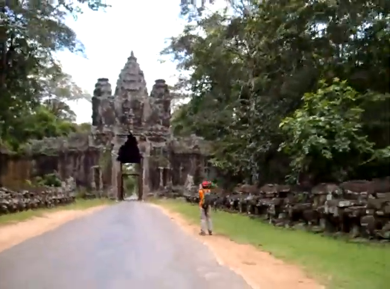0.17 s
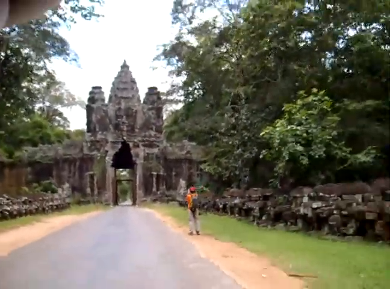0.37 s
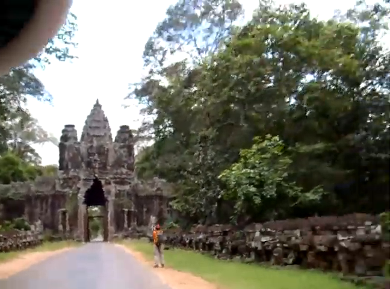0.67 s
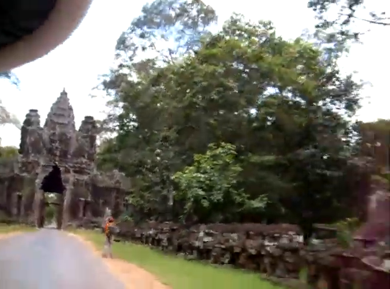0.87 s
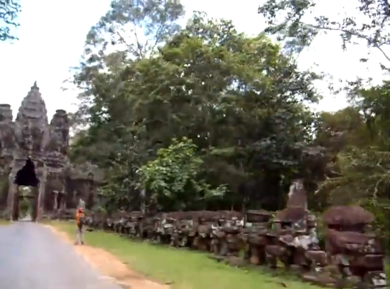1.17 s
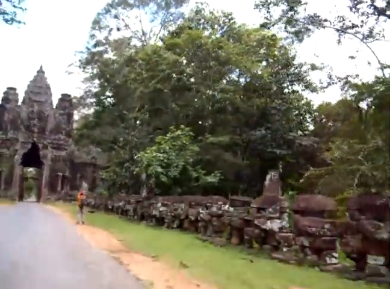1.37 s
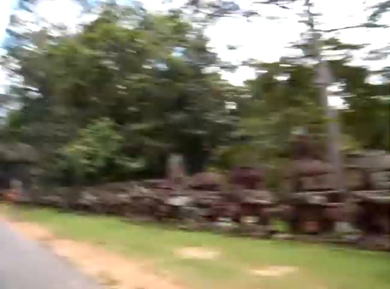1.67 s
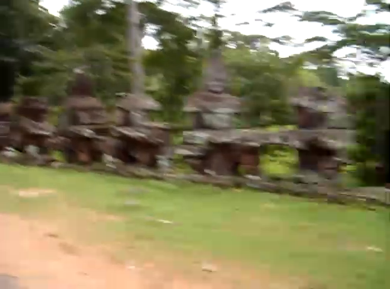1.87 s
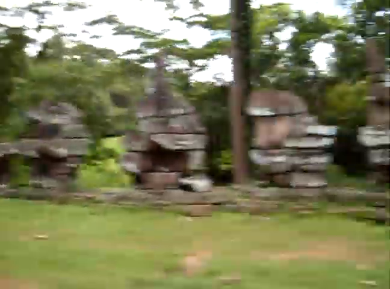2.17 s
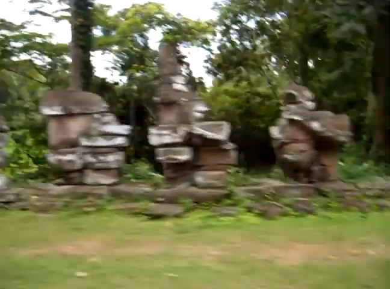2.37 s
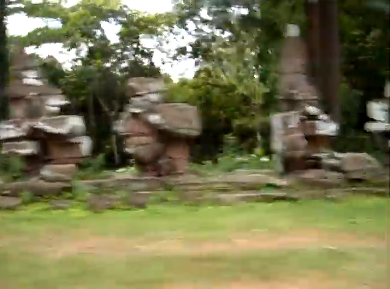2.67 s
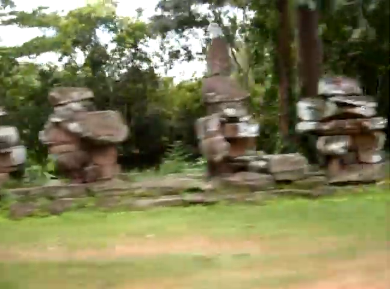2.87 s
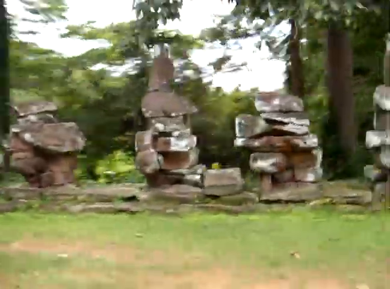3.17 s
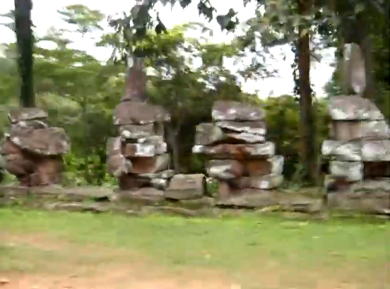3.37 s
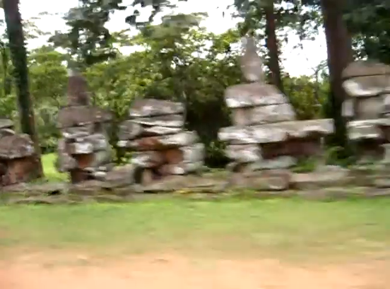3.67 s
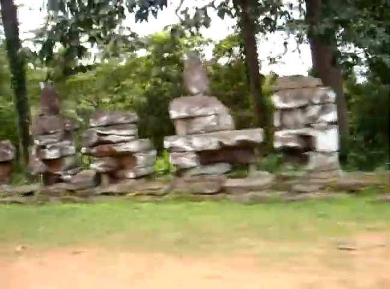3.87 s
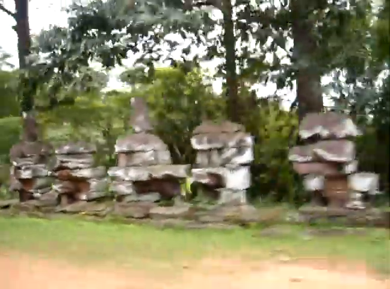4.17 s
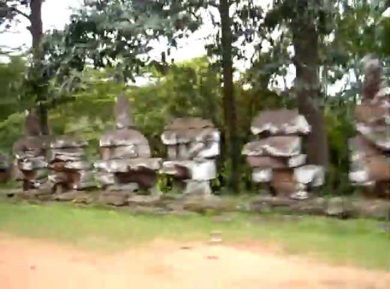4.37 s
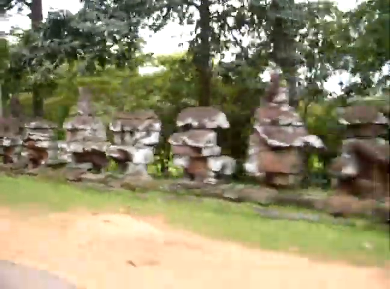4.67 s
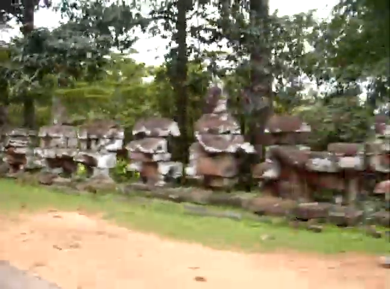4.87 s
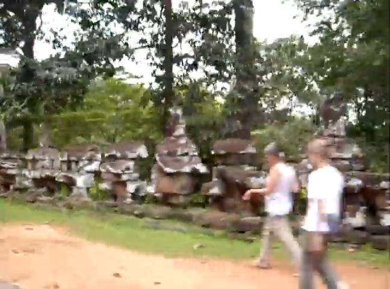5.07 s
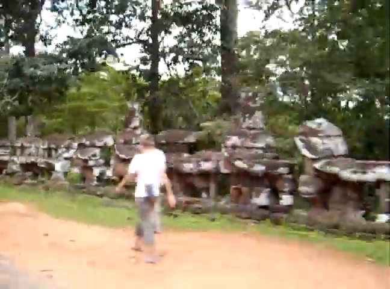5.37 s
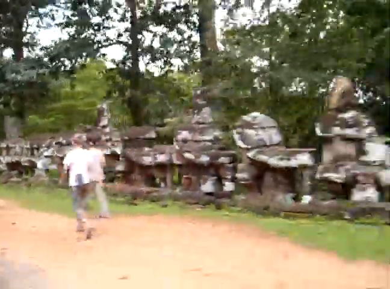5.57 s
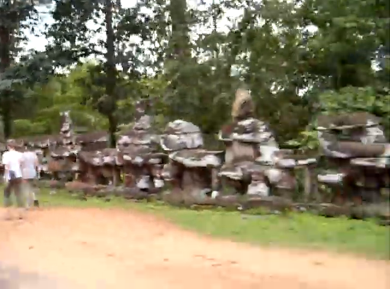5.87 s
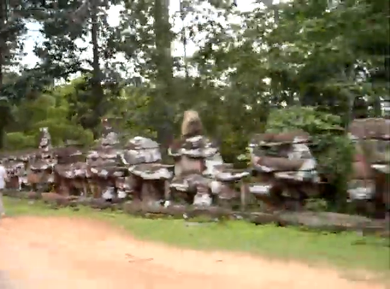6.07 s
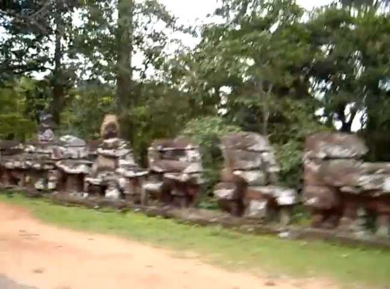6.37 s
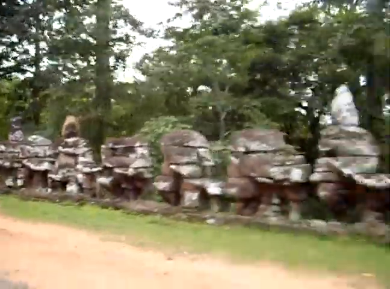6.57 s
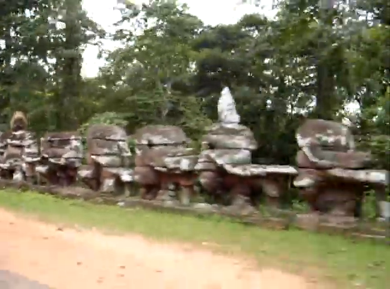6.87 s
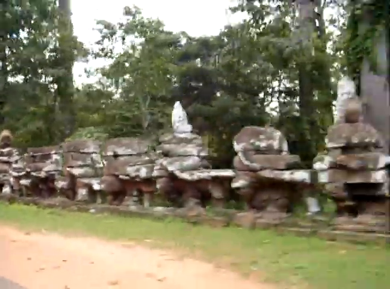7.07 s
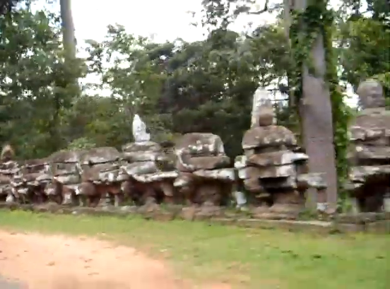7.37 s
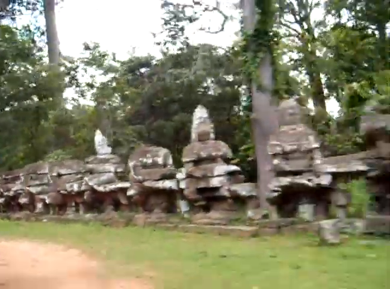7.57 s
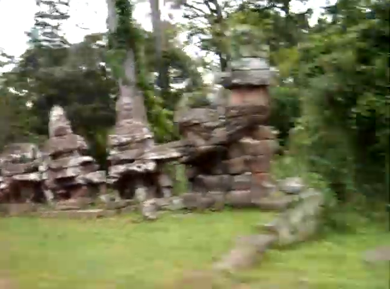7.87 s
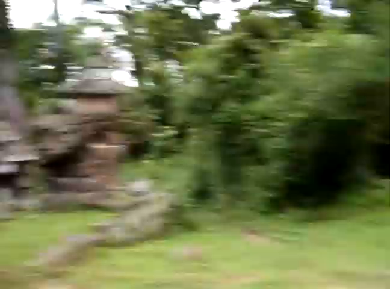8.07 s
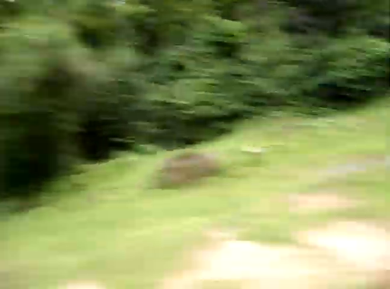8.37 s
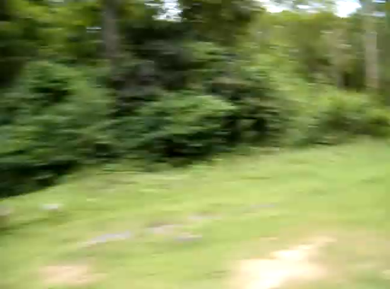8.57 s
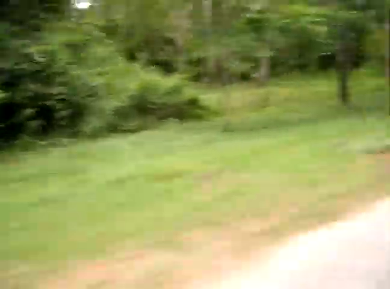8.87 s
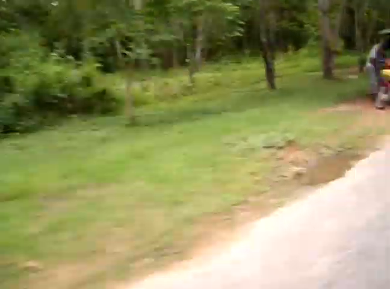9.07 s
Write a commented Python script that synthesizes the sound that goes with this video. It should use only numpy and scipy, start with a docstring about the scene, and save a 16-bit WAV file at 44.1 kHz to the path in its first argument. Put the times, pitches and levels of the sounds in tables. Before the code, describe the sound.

On an open road, wind rumbles and flaps against a small unprotected microphone, with dull thumps, sharp snaps and clipped bursts. In the calmer gaps a single-cylinder motorbike engine putters and drones low, with faint tyre hiss and a thin drive whine. Near the end the wind meets the mic head-on and becomes a continuous, distorted roar.

```python
"""Wind buffets a small microphone in a motorbike-drawn cart on an open road.
Band noise rumbles, brighter as the air stream strengthens, until the input overloads; swells, puffs,
vortices and snaps add pressure thumps and tears. At the end the microphone meets the stream head-on.
Underneath, firing pulses ring the exhaust of a single-cylinder engine beside a sine drone; the tyres
hiss in coloured noise, the drive whines as a wavering sine and fittings tick as resonant noise."""
import sys
import numpy as np
from scipy import signal
from scipy.io import wavfile
from scipy.ndimage import uniform_filter1d

SR = 44100
rng = np.random.default_rng(int(sys.argv[2]) if len(sys.argv) > 2 else 0)


def generate_wav(signal):
    """Clip the signal to [-1, 1] and save it as 16-bit WAV at the path in sys.argv[1]."""
    frames = np.transpose(np.atleast_2d(signal))
    scaled = np.clip(frames, -1, 1) * 32767
    pcm = np.round(scaled).astype(np.int16)
    wavfile.write(sys.argv[1], SR, pcm)


N = 406161
TIME = np.arange(N) / SR


def from_db(db):
    """Decibels to gain."""
    return 10 ** (np.asarray(db) / 20)


def highpass(x, order, hz):
    """Butterworth high-pass."""
    return signal.sosfilt(signal.butter(order, hz, "high", fs=SR, output="sos"), x)


def bandpass(x, order, low_hz, high_hz):
    """Butterworth band-pass."""
    return signal.sosfilt(signal.butter(order, [low_hz, high_hz], "band", fs=SR, output="sos"), x)


def lowpass_zero_phase(x, order, hz):
    """Butterworth low-pass run both ways."""
    return signal.sosfiltfilt(signal.butter(order, hz, fs=SR, output="sos"), x)


def rms_one(x):
    """Scale to unit power."""
    return x / np.sqrt(np.mean(x ** 2) + 1e-20)


def in_time(rows):
    """Each column of a curve at every sample."""
    time_s, *columns = np.transpose(rows)
    return [np.interp(TIME, time_s, column) for column in columns]


def at_hz(rows, hz):
    """Each column of a spectrum at one frequency, interpolated over log frequency."""
    points_hz, *columns = np.transpose(rows)
    return [np.interp(np.log(hz), np.log(points_hz), column) for column in columns]


def around(time_s, before_s, after_s):
    """Slice of samples about a moment, cut at the start."""
    return slice(max(int((time_s - before_s) * SR), 0), int((time_s + after_s) * SR))


def drift(rate_hz):
    """Smooth chance with spread 1 that changes about rate_hz times a second."""
    step = 20  # samples per slow point
    settle = 2000
    r = np.exp(-2 * np.pi * rate_hz * step / SR)
    white = rng.standard_normal(N // step + 2 + settle)
    slow = signal.lfilter([1], [1, -2 * r, r * r], white)[settle:]
    return np.interp(np.arange(N) / step, np.arange(len(slow)), rms_one(slow))


def noise_bands(low_hz, high_hz):
    """Yield (centre Hz, noise of unit power per Hz) for bands 0.4 octave wide."""
    edges_hz = 2 ** np.arange(np.log2(low_hz), np.log2(high_hz) + .4, .4)
    white = rng.standard_normal((2, N + SR // 2))  # neighbouring bands use separate noise
    for k, (low, high) in enumerate(zip(edges_hz, edges_hz[1:])):
        band = bandpass(white[k % 2], 2, low, high)[-N:]
        yield np.sqrt(low * high), rms_one(band) * np.sqrt(high - low)


def coloured_noise(colour):
    """Steady noise with the given spectrum; rms 1."""
    out = 0
    for hz, band in noise_bands(colour[0][0], colour[-1][0]):
        out = out + from_db(at_hz(colour, hz)[0]) * band
    return rms_one(out)


def resonate(x, modes):
    """Parallel two-pole resonances with alternating signs."""
    out = 0
    for k, (hz, width_hz, db) in enumerate(modes):
        r = np.exp(-np.pi * width_hz / SR)
        poles = [1, -2 * r * np.cos(2 * np.pi * hz / SR), r * r]
        ring = signal.lfilter([1, 0, -1], poles, x + 1e-18)
        out = out + (-1) ** k * from_db(db) * (1 - r * r) / 2 * ring
    return out


# tyres on the road: (time [s], level [dB])
ROAD_LEVEL = [(0, -35.5), (1.8, -32.5), (2.1, -28.5), (2.7, -29), (3.2, -31), (3.6, -28.5), (4.0, -31.5),
              (4.3, -33), (6.3, -33.5), (7.6, -32.5), (7.9, -27.5), (8.2, -34.5)]
# tyre spectrum shape: (frequency [Hz], relative density [dB per Hz])
ROAD_COLOUR = [(100, -0.5), (250, -9.5), (500, -3), (800, -0.5), (1200, 0.5), (1600, -8.5), (1950, -19.5),
               (2600, -8), (3300, -15.5), (4200, -19.5), (5000, -12.5), (6000, -15)]


def tyres(grit_db):
    """Rolling noise, slightly grainy from the rough surface."""
    return from_db(in_time(ROAD_LEVEL)[0] + grit_db * drift(150)) * coloured_noise(ROAD_COLOUR)


# fittings touching: (time [s], onset level [dB])
TICKS = [(4.364, -26.5), (4.759, -27)]
# ring of the fittings: (frequency [Hz], width [Hz], relative level [dB])
FITTING_MODES = [(3970, 240, 0), (4740, 500, -2)]


def ticks(decay_s):
    """Loose fittings touch briefly: decaying bursts of resonant noise."""
    touches = np.zeros(N)
    for time_s, db in TICKS:
        touches += from_db(db) * (TIME >= time_s) * np.exp(-np.abs(TIME - time_s) / decay_s)
    return touches * rms_one(resonate(rng.standard_normal(N), FITTING_MODES))


# drive whine, swooping as the load changes: (time [s], centre frequency [Hz])
WHINE_PITCH = [(0, 2390), (4.45, 2406), (4.8, 2335), (4.92, 2470), (5.03, 2378), (5.38, 2450), (5.5, 2364),
               (6.05, 2430), (7.2, 2374), (7.5, 2345)]
# drive whine: (time [s], level [dB])
WHINE_LEVEL = [(0.6, -47.5), (4.0, -49.5), (4.88, -43), (5.8, -47), (6.1, -44.5), (7.5, -44.5),
               (8.3, -50.5)]


def whine(waver_hz, blur_hz, flicker_db):
    """A thin sine from the drive, unsteady in pitch and level."""
    pitch_hz = in_time(WHINE_PITCH)[0] + waver_hz * drift(6.8) + blur_hz * drift(150)
    cycles = np.cumsum(pitch_hz) / SR
    tone = np.sin(2 * np.pi * cycles) * from_db(flicker_db * drift(19))
    return from_db(in_time(WHINE_LEVEL)[0]) * rms_one(tone)


# engine: (time [s], mean crank speed [turns/s], level before the part gains [dB])
ENGINE = [(0, 62.4, -28), (1.5, 57.4, -25), (3, 58.3, -23.5), (6, 62.2, -25), (7.5, 66, -25.5),
          (9.21, 71.5, -35)]
# exhaust resonances: (frequency [Hz], width [Hz], relative level [dB])
EXHAUST_MODES = [(134, 36, 9), (168, 52, 1), (400, 170, -12)]


def engine(wander, uneven_db, putter_db, drone_db):
    """One firing every second turn rings the exhaust; the second crank order drones clean."""
    turns_per_s, level_db = in_time(ENGINE)
    turns = np.cumsum(turns_per_s * (1 + wander * drift(3.1))) / SR
    firings = np.diff(np.floor(turns / 2), prepend=0) * from_db(uneven_db * drift(43))
    putter = rms_one(resonate(firings, EXHAUST_MODES))
    drone = rms_one(np.sin(2 * np.pi * 2 * turns))
    return from_db(level_db) * (from_db(putter_db) * putter + from_db(drone_db) * drone)


# slow pressure swells: (time [s], level before lumps [dB])
SWELL_LEVEL = [(0.0, -18.5), (0.18, -14.5), (0.62, -24), (1.13, -18.5), (2.59, -17.5), (2.84, -23.5),
               (8.44, -19.5), (8.93, -22)]
# swell spectrum shape: (frequency [Hz], relative density [dB per Hz])
SWELL_COLOUR = [(12, -0.5), (18, 0.5), (30, -1), (50, -8), (80, -9.5), (130, -15), (300, -50)]


def swell(lumps_db):
    """The largest eddies push the diaphragm slowly to and fro, in lumps with lulls between."""
    return from_db(in_time(SWELL_LEVEL)[0] + lumps_db * drift(17)) * coloured_noise(SWELL_COLOUR)


# dull pressure puffs: (time [s], peak level before the leak [dB])
PUFFS = [(1.138, 2.5), (2.497, 1), (2.632, 1.5), (2.94, 0.5), (3.465, -2.5), (4.356, -3.5), (4.554, -2.5),
         (4.704, -4), (5.598, -6), (6.99, 2), (8.148, -1)]


def puffs(build_s, release_s, leak_hz):
    """Pressure piles up on the port and collapses; the capsule's vent leaks it away."""
    pressure = np.zeros(N)
    for time_s, db in PUFFS:
        near = np.abs(TIME - time_s) < .1
        age_s = TIME[near] - time_s
        pressure[near] += from_db(db) * np.exp(-np.maximum(-age_s / build_s, age_s / release_s))
    return highpass(pressure, 1, leak_hz)


# tight vortices crossing the port: (time [s], envelope peak [dB], nominal pitch [Hz])
VORTICES = [(1.14, 2, 481.6), (1.541, 3, 447), (2.333, 4, 402), (2.452, -3.5, 522), (2.488, -4.5, 450),
            (2.522, 0, 433), (2.589, -4.5, 602), (2.646, -4.5, 549.5), (2.825, -1.5, 496.3),
            (3.766, -5, 521), (3.804, -0.5, 345.4), (4.002, -3.5, 553), (4.06, -7.5, 600),
            (6.502, -2.5, 796.2), (8.34, -0.5, 376)]


def vortices(rise_cycles, fall_cycles, tail_s, rough_octaves, steepness):
    """Ragged, steep-fronted pressure cycles: large vortices thump, small ones crack."""
    out, ragged = np.zeros(N), drift(2500)
    for time_s, db, hz in VORTICES:
        near = np.abs(TIME - time_s) < .05
        age_s = TIME[near] - time_s
        # the roughness is stretched to the vortex's own cycle
        roughness = np.interp(age_s * hz / 2500, age_s, ragged[near])
        phase = 2 * np.pi * np.cumsum(hz * 2 ** (rough_octaves * roughness)) / SR
        outside = np.maximum(-age_s / (rise_cycles / hz), age_s / (fall_cycles / hz + tail_s))
        out[near] += from_db(db) * np.exp(-outside) * np.sin(phase + steepness * np.sin(phase))
    return out


# air tearing at the port edge: (time [s], peak level [dB])
SNAPS = [(0.32, -14.5), (0.478, -13.5), (0.535, -6), (0.929, -11.5), (1.097, -14.5), (1.61, -14.5),
         (2.336, -6), (2.409, -19), (2.427, -12), (2.488, -10.5), (2.534, -13), (2.591, -20), (2.645, -9),
         (2.829, -11), (3.766, -14), (3.875, -19), (4.002, -22), (4.057, -9), (5.272, -18), (5.76, -6),
         (6.015, -1), (6.468, -13.5), (6.501, -10), (7.056, -14), (8.339, -11.5)]


def snaps(low_hz, high_hz, top_hz, rise_s, fall_s):
    """Each tear is a few milliseconds of ragged pressure, full in the middle, falling in the treble."""
    ragged = bandpass(rng.standard_normal(N), 1, low_hz, high_hz)
    ragged = lowpass_zero_phase(ragged, 2, top_hz)
    short_power = uniform_filter1d(ragged ** 2, size=SR // 400)
    ragged = ragged / np.sqrt(short_power + 1e-12)
    envelope = np.zeros(N)
    for time_s, db in SNAPS:
        near = np.abs(TIME - time_s) < .03
        age_s = TIME[near] - time_s
        envelope[near] += from_db(db) * np.exp(-np.maximum(-age_s / rise_s, age_s / fall_s))
    return envelope * ragged


# how squarely the microphone faces the stream: (time [s], share [0-1])
FACING = [(8.47, 0.3), (8.66, 0.78), (8.71, 0.87), (8.79, 1), (8.88, 0.92), (9.04, 1), (9.21, 0.95)]


def facing_share():
    """Share of the stream met head-on."""
    return np.clip(in_time(FACING)[0], 0, 1)


# steady air stream before the facing gain: (time [s], strength [dB])
STREAM = [(0, -30), (0.3, -28), (0.6, -31), (1.25, -29.5), (1.42, -30.5), (2.05, -30), (2.25, -37),
          (2.5, -26), (2.75, -35.5), (3.9, -35.5), (4.2, -37), (5.15, -37), (5.6, -31), (6.25, -32.5),
          (6.9, -27), (7.4, -32), (8.3, -32.5)]
# gusts: (crest time [s], strength [dB], rise constant [s])
GUSTS = [(0.17, -15.5, 0.068), (0.42, -17, 0.091), (0.87, -17.5, 0.06), (1.11, -17.5, 0.027),
         (1.517, -12.5, 0.03), (1.98, -17.5, 0.2), (2.49, -18.5, 0.07), (2.634, -14, 0.018),
         (3.029, -16.5, 0.0063), (3.121, -19.5, 0.0088), (3.319, -18, 0.02), (3.56, -18.5, 0.013),
         (3.686, -19, 0.014), (3.821, -21, 0.041), (4.03, -19.5, 0.11), (4.645, -22, 0.058),
         (5.018, -19, 0.049), (5.25, -21.5, 0.12), (5.538, -18.5, 0.051), (5.79, -18.5, 0.033),
         (6.034, -17, 0.024), (6.432, -17.5, 0.045), (6.51, -17.5, 0.05), (6.704, -15, 0.047),
         (6.89, -17.5, 0.052), (7.048, -15, 0.023), (7.265, -19, 0.037), (7.77, -21, 0.072),
         (8.149, -16.5, 0.03), (8.45, -17, 0.084)]
FACING_GAIN_DB = 24.5
GUST_EBB = 1.88  # ebb constant / rise constant


def air_flow(facing):
    """Stream strength in dB: steady flow, more when met head-on, and gusts that swell and ebb."""
    flow = from_db(in_time(STREAM)[0] + FACING_GAIN_DB * facing)
    for crest_s, db, rise_s in GUSTS:
        near = around(crest_s, .3, .3)
        age_s = TIME[near] - crest_s
        outside = np.maximum(-age_s, age_s / GUST_EBB) / rise_s
        flow[near] = np.maximum(flow[near], from_db(db) * np.exp(-outside))
    return 20 * np.log10(flow)


# sharp eddies slapping the port: (time [s], strength before buffet_db [dB], hold [s])
BUFFETS = [(0.14, -8.5, 0.016), (0.155, -3.5, 0.026), (0.205, -6, 0.013), (0.362, -6.5, 0.022),
           (0.391, -6, 0.025), (0.448, -8.5, 0.011), (0.871, -13.5, 0.017), (1.094, -10.5, 0.013),
           (1.136, -11, 0.0042), (1.493, -6, 0.012), (1.519, -10.5, 0.016), (1.968, -7, 0.0073),
           (2.002, -9, 0.019), (2.408, -12.5, 0.017), (2.485, -12, 0.0074), (5.763, -15.5, 0.0082),
           (5.785, -9.5, 0.01), (5.854, -5, 0.0022), (6.007, -12.5, 0.012), (6.526, -13.5, 0.0092),
           (6.714, -10, 0.0065), (6.767, -12, 0.018), (6.959, -8, 0.0058), (7.018, -10, 0.01),
           (7.246, -11, 0.0097), (7.761, -12, 0.016), (7.879, -11.5, 0.016), (8.394, -8.5, 0.023),
           (8.46, -11, 0.037), (8.532, -12.5, 0.014), (8.585, -12, 0.023), (8.621, -8.5, 0.06)]


def wind_strength(flow_db, facing, flutter_db, lumps_db, gustiness, steadying,
                  buffet_db, rise_s, fall_s):
    """Strength in dB: the stronger of the fluttering flow and the sharp eddy passing."""
    flutter = drift(100)
    # mostly calm, with brief flaps of limited strength
    flutter = np.minimum(flutter + gustiness * (flutter ** 2 - 1), 2.6)
    unsteady_db = flutter_db * flutter + lumps_db * drift(15)
    stream_db = flow_db + (1 - steadying * facing) * unsteady_db
    eddies = np.zeros(N)
    for time_s, db, hold_s in BUFFETS:
        near = around(time_s, .1, .2)
        age_s = TIME[near] - time_s
        outside = np.maximum(-age_s / rise_s, (age_s - hold_s) / fall_s)
        eddy = from_db(db + buffet_db) * np.exp(-np.maximum(outside, 0))
        eddies[near] = np.maximum(eddies[near], eddy)
    return 20 * np.log10(np.maximum(from_db(stream_db), eddies))


# moderate turbulence: (frequency [Hz], density [dB per Hz], growth [dB per dB of strength])
TURBULENCE = [(60.4, -46.5, 3.5), (122, -42.5, 0.82), (267, -43.5, 1.24), (472, -49.5, 1.3),
              (796, -56.5, 1.74), (1400, -65.5, 2), (1830, -70, 2), (2874, -80.5, 2.5), (3900, -99.5, 2.5),
              (5800, -87, 2.5)]
# rumble turning to a rush when met head-on: (frequency [Hz], added level at full facing [dB])
HEAD_ON = [(100, 1), (280, -1.5), (650, 2), (1600, -2.5), (2600, 7), (3300, 10.5), (4000, 19), (5500, 5.5)]
MODERATE_DB = -20
# strong eddies are small, so growth stops at a strength over moderate: at 150 Hz, and its rise
CEILING_DB, CEILING_DB_PER_OCTAVE = 4.5, 2.5


def wind(strength_db, facing, patchy_db, spike_db):
    """Faster air sheds smaller eddies, so the treble grows far more steeply than the bass."""
    out, excess_db = 0, strength_db - MODERATE_DB
    for hz, band in noise_bands(55, 6000):
        density_db, growth = at_hz(TURBULENCE, hz)
        head_on_db = facing * at_hz(HEAD_ON, hz)[0]
        ceiling_db = CEILING_DB + CEILING_DB_PER_OCTAVE * np.log2(hz / 150)
        growth_db = growth * np.minimum(excess_db, ceiling_db)
        out = out + band * from_db(density_db + growth_db + head_on_db + patchy_db * drift(29))
    return out * from_db(spike_db * drift(250))  # turbulent pressure comes in short spikes


def scene():
    """Wind on the microphone over the sounds of the cart."""
    cart = tyres(grit_db=2.0) + ticks(decay_s=0.0022)
    cart = cart + whine(waver_hz=24.33, blur_hz=44, flicker_db=4.0)
    cart = cart + engine(wander=.006, uneven_db=4.0, putter_db=-8.0, drone_db=-6.5)

    facing = facing_share()
    swells = swell(lumps_db=3.0) * (1 - 0.17 * facing)
    knocks = puffs(build_s=0.0023, release_s=0.00063, leak_hz=35)
    knocks = knocks + vortices(rise_cycles=0.65, fall_cycles=1.03, tail_s=0.0011,
                               rough_octaves=0.65, steepness=0.47)
    tears = snaps(low_hz=350, high_hz=1890, top_hz=3500, rise_s=0.00056, fall_s=0.0013)
    strength_db = wind_strength(air_flow(facing), facing, flutter_db=2.22, lumps_db=1.0,
                                gustiness=0.16, steadying=0.51,
                                buffet_db=-1.89, rise_s=0.0014, fall_s=0.0035)
    rumble = wind(strength_db, facing, patchy_db=0.86, spike_db=3.5)
    return (cart + swells + knocks + tears + rumble)[None]


INPUT_LIMIT, FULL_SCALE = 0.72, .71  # clip amplitudes
TREBLE_EDGE_HZ, CUTOFF_HZ = 5240, 15800


def record(dry):
    """The input overloads, a narrow-band recorder cuts the treble, and the overshoot clips once more."""
    overloaded = np.clip(dry, -INPUT_LIMIT, INPUT_LIMIT)
    narrow = lowpass_zero_phase(overloaded, 10, TREBLE_EDGE_HZ)
    clipped = np.clip(narrow, -FULL_SCALE, FULL_SCALE)
    return signal.sosfilt(signal.cheby2(12, 70, CUTOFF_HZ, fs=SR, output="sos"), clipped)


dry = scene()
out = record(dry)
generate_wav(out)
```